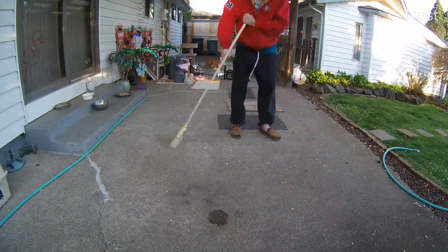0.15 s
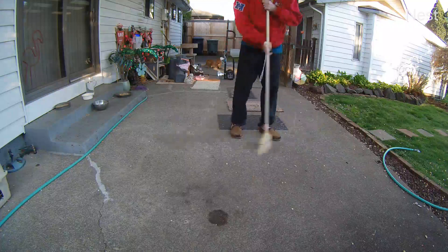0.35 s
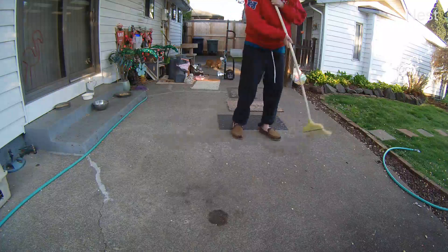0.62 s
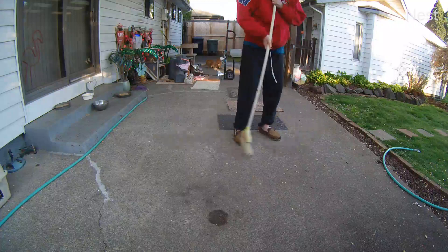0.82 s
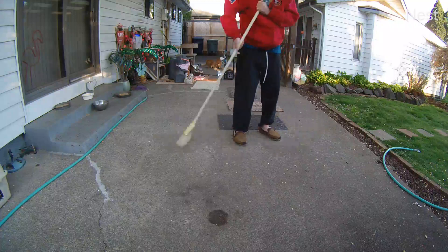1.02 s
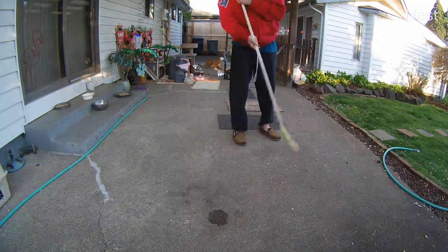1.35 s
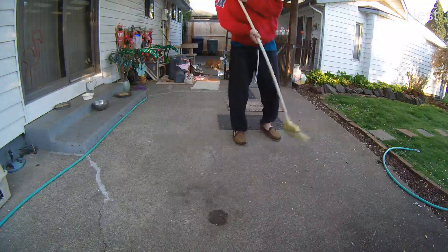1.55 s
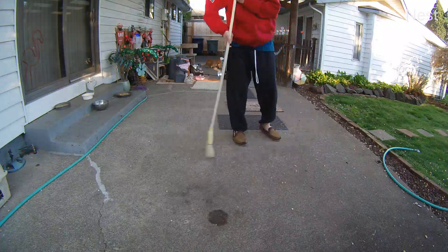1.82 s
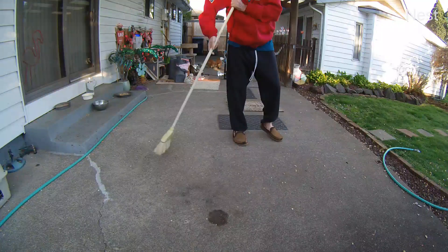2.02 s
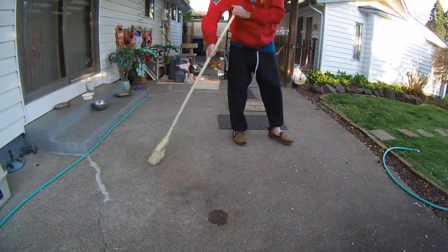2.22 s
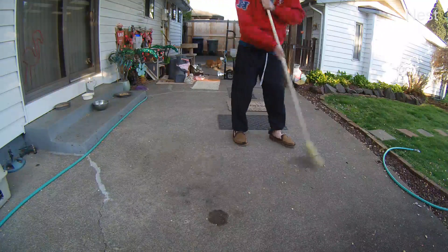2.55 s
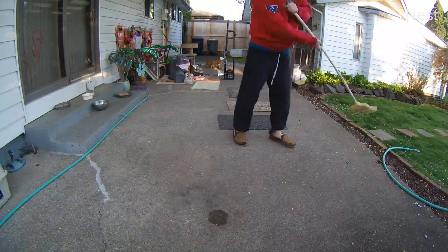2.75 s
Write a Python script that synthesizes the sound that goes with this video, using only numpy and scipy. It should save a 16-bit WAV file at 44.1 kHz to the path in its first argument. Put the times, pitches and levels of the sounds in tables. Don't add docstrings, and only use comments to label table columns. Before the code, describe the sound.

A stiff broom scrapes three bright, gritty strokes across a concrete patio, with faint shoe scuffs between.

```python
import sys
import numpy as np
from scipy import signal
from scipy.fft import rfft, irfft
from scipy.io import wavfile
from scipy.ndimage import uniform_filter1d

SR = 44100
rng = np.random.default_rng(int(sys.argv[2]) if len(sys.argv) > 2 else 0)


def gain_from_decibels(decibels):
    exponent = np.asarray(decibels, float) / 20
    return 10 ** exponent


def master(y):
    cut = np.clip(np.atleast_2d(y).T, -1, 1)
    pcm = np.round(cut * 32767)
    wavfile.write(sys.argv[1], SR, pcm.astype(np.int16))


N = 127890

# frequency in Hz, level in dB.
BRISTLE_HZ_DB = [(320, -48.5), (550, -21), (1070, -13.5), (2920, -7.5), (5220, -2), (6580, -2.5),
                 (8800, -41.5), (11400, -67), (19400, -120)]
# centre in Hz, width in Hz, boost in dB.
BRISTLE_RINGS = [(1108, 130, 7.5), (622, 350, 8), (3450, 130, 5), (4567, 94, 10), (5085, 253, 8),
                 (6000, 200, 4), (5830, 120, -16.5)]


def level(x, db):
    return x * gain_from_decibels(db) / np.sqrt(np.mean(x ** 2))


def colour(x, points, rings=()):
    hz = np.maximum(np.arange(len(x) // 2 + 1) * SR / len(x), 1)
    point_hz, point_db = np.array(points).T
    db = np.interp(np.log(hz), np.log(point_hz), point_db)
    for centre_hz, width_hz, ring_db in rings:
        db = db + ring_db / (1 + (2 * (hz - centre_hz) / width_hz) ** 2)
    return irfft(rfft(x) * gain_from_decibels(db), len(x))


def band(x, lo_hz, hi_hz):
    return signal.sosfilt(signal.butter(2, [lo_hz, hi_hz], "bandpass", fs=SR, output="sos"), x)


def walk(rate_hz):
    targets = rng.standard_normal(999)
    path = np.interp(np.arange(N) / SR * rate_hz, np.arange(999), targets)
    path = uniform_filter1d(path, int(SR / rate_hz) // 2 + 1)
    return path / path.std()


def slips(per_s, scatter_db):
    chance = rng.random(N)
    force = rng.standard_normal(N) * gain_from_decibels(scatter_db * np.minimum(rng.exponential(size=N), 5))
    return force / (1 + np.exp(np.clip((chance * SR / per_s - 1) * 20, -50, 50)))


def sweep(t):
    # time in seconds, level in dB, weight on the head in dB.
    strokes = [
        [(0.185, -66, -5.5), (0.205, -32, 0), (0.227, -32.5, -2), (0.359, -21, 2), (0.465, -24.5, -1.5),
         (0.521, -52, 6.5), (0.62, -59, 3)],
        [(1.245, -63, -1), (1.261, -43, 0.5), (1.285, -27, -2), (1.333, -21, 1.5), (1.343, -31.5, 3.5),
         (1.377, -21.5, -1.5), (1.409, -40.5, 7.5), (1.515, -73.5, 14), (1.54, -55.5, 10.5)],
        [(2.325, -68.5, -2), (2.355, -43, 6.5), (2.455, -22, -0.5), (2.461, -25.5, 1), (2.613, -23.5, -0.5),
         (2.685, -51, 12.5), (2.8, -58.5, -19)],
    ]
    head_hz, patchy_db, patch_per_s, sweep_db = 1500, 1.1, 35, 2.03
    tips = level(colour(slips(12000, 1.7), BRISTLE_HZ_DB, BRISTLE_RINGS), 0)
    edges_hz = 300 * 2 ** np.arange(0, 5.1, .5)
    common = walk(patch_per_s)
    parts = []
    for lo_hz, hi_hz in zip(edges_hz, edges_hz[1:]):
        flicker_db = patchy_db * (common + walk(18) / 2)
        parts.append(band(tips, lo_hz, hi_hz) * gain_from_decibels(flicker_db))
    out = 0
    for rows in strokes:
        s, db, head_db = np.array(rows).T
        gain = gain_from_decibels(np.interp(t, s, db, -120, -120))
        head = gain_from_decibels(np.interp(t, s, head_db))
        out = out + gain * sum(p * (head if lo_hz < head_hz else 1) for p, lo_hz in zip(parts, edges_hz))
    return out * gain_from_decibels(sweep_db)


def scuffs(t):
    starts_s = [.059, .829, 1.901, .97, .69, 1.555, 2.835]
    # level in dB, hold in seconds, dull part in dB.
    rubs = [(-42.5, 0.029, -2), (-50, 0.032, 4.5), (-55, 0.019, -12.5), (-61.5, 0.11, -10),
            (-60, 0.022, -6.5), (-57, 0.021, -9.5), (-58, 0.046, -8)]
    # frequency in Hz, level in dB.
    rub_hz_db = [(88, -43), (150, -7.5), (435, 6.5), (3260, 7.5), (4540, -2.5), (7240, -19.5),
                 (8000, -27.5), (10400, -81.5), (17600, -120)]
    attack_s, release_db_per_s = .006, 330
    rub = colour(slips(8000, 2.0), rub_hz_db, [(430, 200, 5), (2220, 200, 4)])
    dull = level(band(rub, 150, 2400), 0)
    bright = level(colour(slips(8000, 2.0), BRISTLE_HZ_DB, BRISTLE_RINGS), 0)
    out = 0
    for s, (db, hold_s, dull_db) in zip(starts_s, rubs):
        rise = np.clip((t - s) / attack_s, 0, 1)
        fade_db = release_db_per_s * np.maximum(t - s - hold_s, 0)
        out = out + rise * gain_from_decibels(db - fade_db) * (bright + gain_from_decibels(dull_db) * dull)
    return out


def grit(t):
    skips_s = [1.567, 1.58, 1.598, 1.675, 1.065, 2.858, 1.905]
    skips_db = [-42, -49, -51, -57, -55, -49, -51]
    centre_hz, width_hz, decay_s = 5600, 3200, .004
    rattle = level(band(slips(6000, 0.97), centre_hz - width_hz / 2, centre_hz + width_hz / 2), 0)
    envelope = 0
    for s, db in zip(skips_s, skips_db):
        envelope = envelope + gain_from_decibels(db) * (t > s) * np.exp(-np.maximum(t - s, 0) / decay_s)
    return rattle * envelope


def creaks(t):
    # start in seconds, length in seconds, level in dB, start in Hz, end in Hz.
    creak_rows = [
        (-.04, 0.1, -50, 939, 936),
        (2.183, 0.14, -51, 968, 862.7),
        (2.293, 0.056, -48, 900, 840),
    ]
    width_hz, second_db, hiss_db = 110, -4, -6
    narrow = level(band(rng.standard_normal(N), 1, .5 * width_hz), 0)
    broad = level(band(rng.standard_normal(N), 1, 1.5 * width_hz), 0)
    hiss = level(band(rng.standard_normal(N), 1400, 3200), hiss_db)
    out = 0
    for s, length_s, db, start_hz, end_hz in creak_rows:
        x = np.clip((t - s) / length_s, 0, 1)
        phase = 2 * np.pi * np.cumsum(start_hz + (end_hz - start_hz) * x) / SR
        ring = narrow * np.sin(phase) + gain_from_decibels(second_db) * broad * np.sin(1.75 * phase)
        out = out + gain_from_decibels(db) * np.abs(np.sin(np.pi * x)) ** .7 * (ring + hiss)
    return out


def yard_echo(near):
    t60_s, echo_db, gap_s = 0.36, -12, 0.023
    late_s = np.arange(SR) / SR - gap_s
    tail = rng.standard_normal(SR) * (late_s > 0) * gain_from_decibels(-60 * late_s / t60_s)
    tail = level(tail, echo_db) / np.sqrt(SR)
    return signal.fftconvolve(near, tail)[:N]


def town():
    # frequency in Hz, level in dB.
    town_hz_db = [(80, -18.5), (350, -7), (900, 0.5), (1400, -3.5), (2200, -11), (5000, -10), (6800, -14.5),
                  (9000, -33.5)]
    hiss = colour(rng.standard_normal(N), town_hz_db, [(5200, 300, 4.8), (1190, 270, 3.5)])
    swell = walk(1.5)
    edges_hz = 75 * 2 ** np.arange(0, 7.1, .5)
    out = 0
    for lo_hz, hi_hz in zip(edges_hz, edges_hz[1:]):
        out = out + band(hiss, lo_hz, hi_hz) * gain_from_decibels(2.4 * swell + 1.0 * walk(7.843))
    return level(out, -61.5)


def scene():
    t = np.arange(N) / SR
    near = sweep(t) + scuffs(t) + grit(t) + creaks(t)
    return (near + yard_echo(near) + town())[None]


def squeeze(x, size, per_octave, step_db):
    offset, treble_coarser_db, step_scatter_db = 300, 9, 3.5
    kept_lo_hz, kept_hi_hz, masked_lo_hz, masked_hi_hz = 480, 6900, 7700, 8450
    drop_db, edge_scatter_db, lag, top_floor_db = -12, 2, .55, -107.5
    hole_rarity, holes_from_hz = 1.9, 1400

    n, k = np.arange(2 * size), np.arange(size // 2)
    window = np.sin(np.pi * (n[:, None] + .5) / size / 2)
    basis = np.cos(np.pi / size * np.outer(n + .5 + size / 2, k + .5)) * window
    padded = np.pad(x, (2 * size - offset, 2 * size))
    at = np.arange(len(padded) // size - 1)[:, None] * size + n
    lines = padded[at] @ basis

    hz = k * SR / 2 / size
    group = (per_octave * np.log2((700 + hz) / (700 + kept_hi_hz)) + 99).astype(int)
    member = group[:, None] == np.arange(group.max() + 1)
    band_db = 10 * np.log10(lines ** 2 @ member / np.maximum(member.sum(0), 1) + 1e-20)
    frame_db = 10 * np.log10(np.mean(lines ** 2, axis=1, keepdims=True) + 1e-20)
    held = uniform_filter1d(rng.standard_normal(band_db.shape), size=3, axis=0) * np.sqrt(3)

    coarse_db = step_db + treble_coarser_db * np.clip(np.log2(1 + hz / 700) / 2.5, 0, 1)
    step = gain_from_decibels(coarse_db + (band_db + step_scatter_db * held)[:, group])
    recent_db = signal.lfilter([1 - lag], [1, -lag], frame_db - frame_db[0], axis=0) + frame_db[0]
    weak = (band_db + edge_scatter_db * held < recent_db + drop_db)[:, group]
    faint = (band_db + held - 10 * np.log10(size * SR / 4) < top_floor_db)[:, group]
    masked = (hz < kept_lo_hz) | (hz > masked_lo_hz) & (hz < masked_hi_hz)
    hole = (held < -hole_rarity)[:, group] & (hz > holes_from_hz)
    lines = lines * ~(weak & masked | faint & (hz > kept_hi_hz) | hole)

    out = np.zeros(len(padded))
    np.add.at(out, at, np.round(lines / step) * step @ basis.T * 2 / size)
    out = out[2 * size - offset:][:N]
    before, after = (np.sqrt(np.abs(uniform_filter1d(v ** 2, size=400)) + 1e-14) for v in (x, out))
    return out * np.minimum(1, 1.15 * before / after)


def roll_off(x):
    return signal.sosfilt(signal.butter(12, 9090, fs=SR, output="sos"), x)


def record(dry):
    # start in seconds, end in seconds.
    short_spans_s = [(0, .21), (1.235, 1.29)]
    low_hz, top_hz, top_db, peak = 140, 6900, -3.5, .2
    mic_hz_db = [(low_hz / 2, -18), (low_hz, 0), (top_hz, 0), (top_hz * 1.308, top_db)]
    x = peak * np.tanh(colour(dry[0], mic_hz_db) / peak)
    t = np.arange(N) / SR
    short = uniform_filter1d(1. * sum((t >= a) & (t < b) for a, b in short_spans_s), size=200)
    long_blocks = squeeze(x * (1 - short), size=2048, per_octave=28, step_db=-1)
    short_blocks = squeeze(x, size=512, per_octave=5, step_db=1.5)
    mix = (1 - short) * long_blocks + short * short_blocks
    return roll_off(mix[None])


dry = scene()
out = record(dry)
master(out)
```